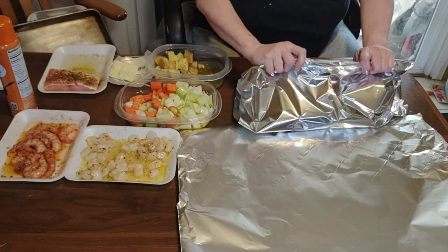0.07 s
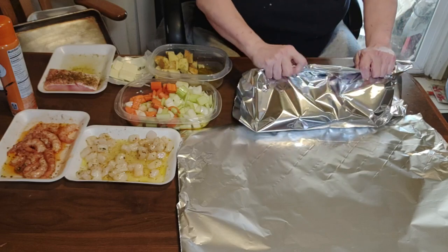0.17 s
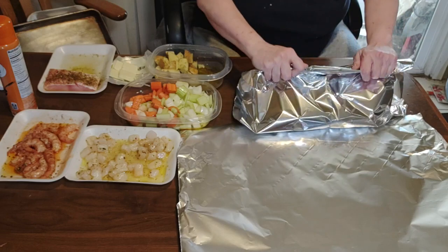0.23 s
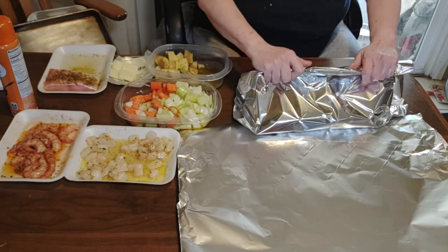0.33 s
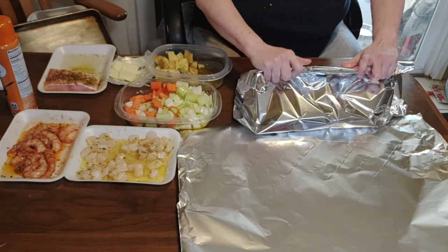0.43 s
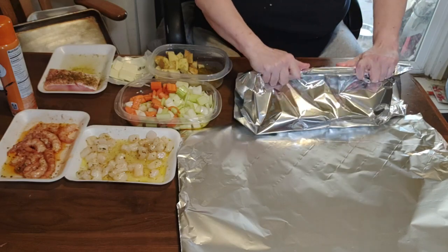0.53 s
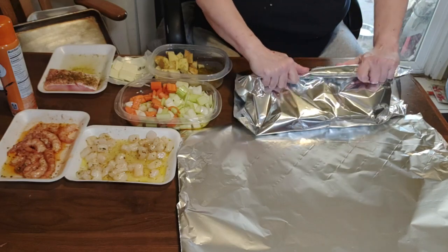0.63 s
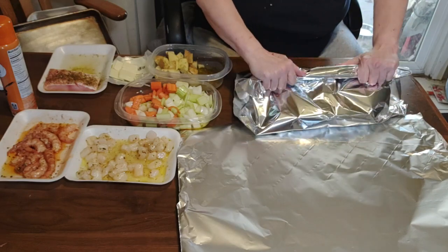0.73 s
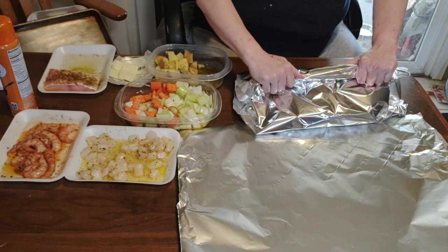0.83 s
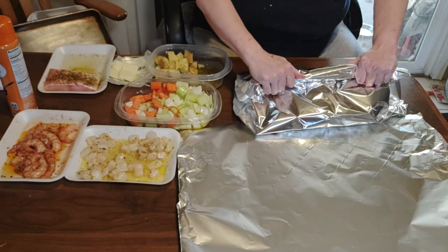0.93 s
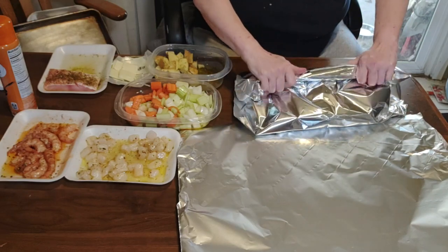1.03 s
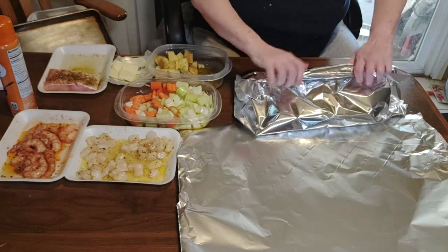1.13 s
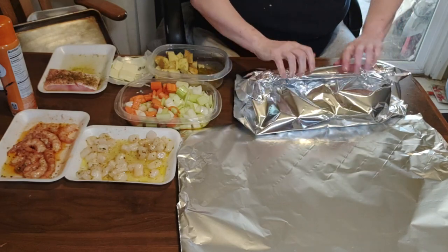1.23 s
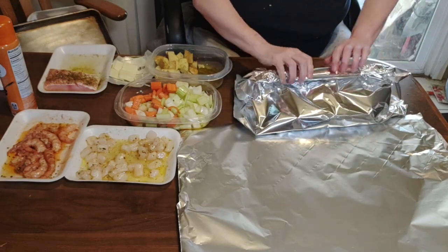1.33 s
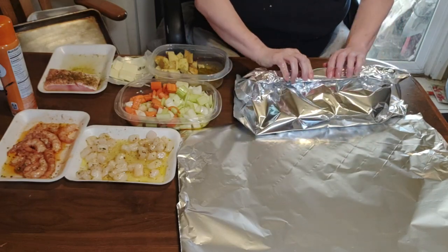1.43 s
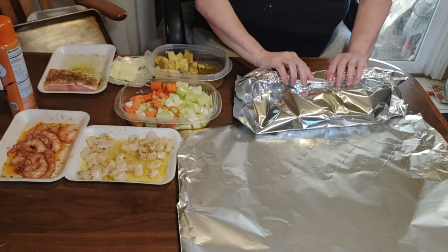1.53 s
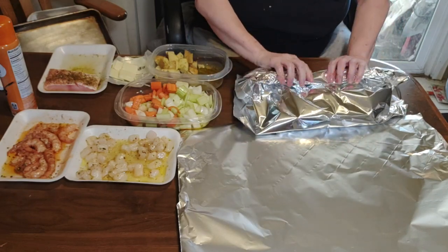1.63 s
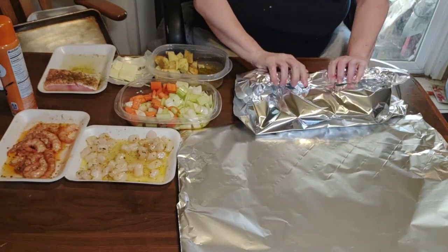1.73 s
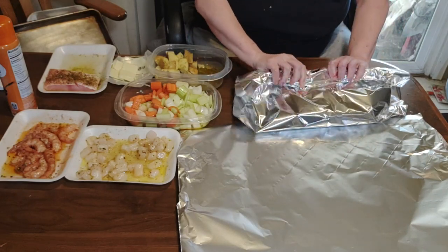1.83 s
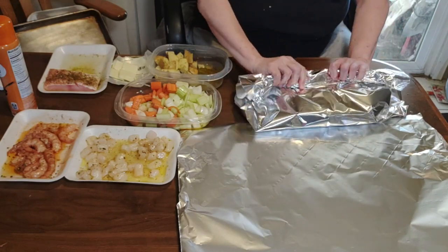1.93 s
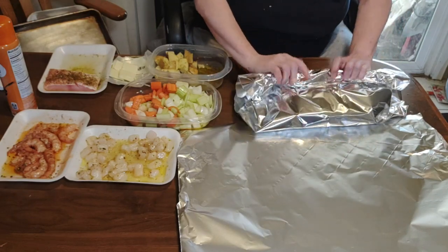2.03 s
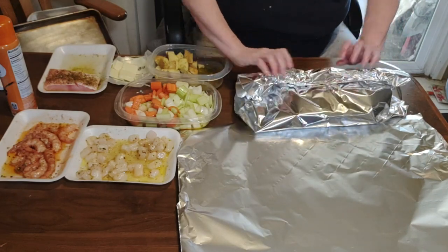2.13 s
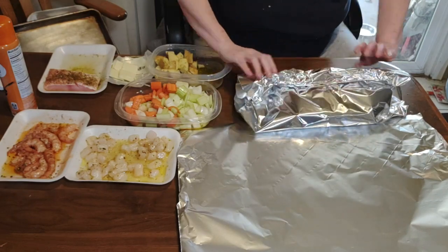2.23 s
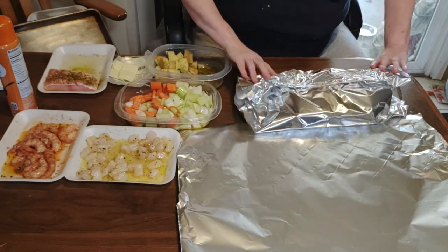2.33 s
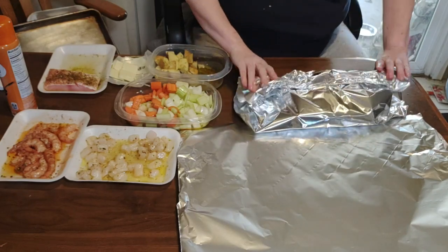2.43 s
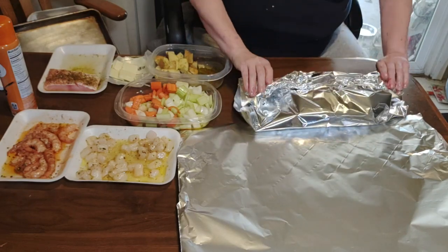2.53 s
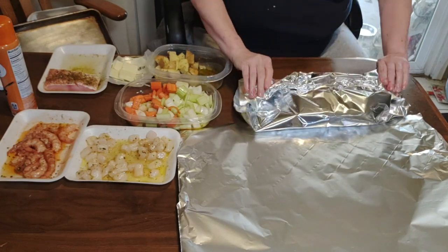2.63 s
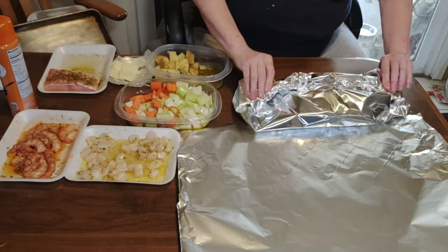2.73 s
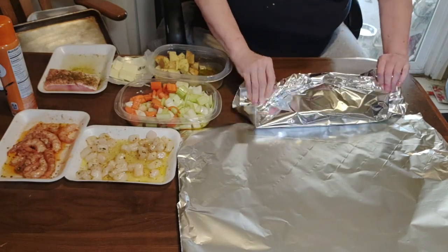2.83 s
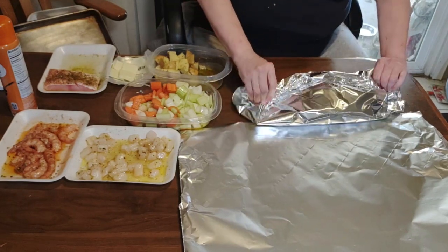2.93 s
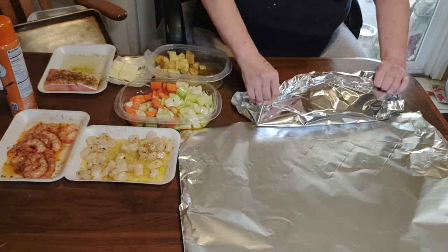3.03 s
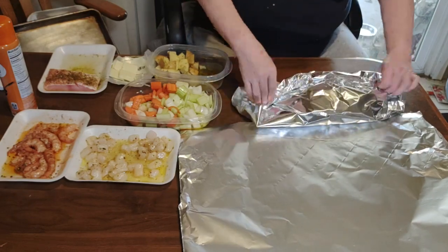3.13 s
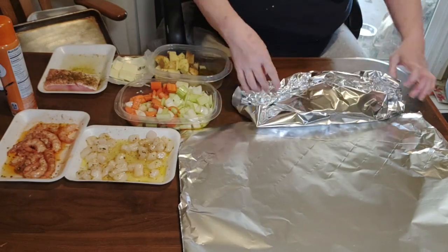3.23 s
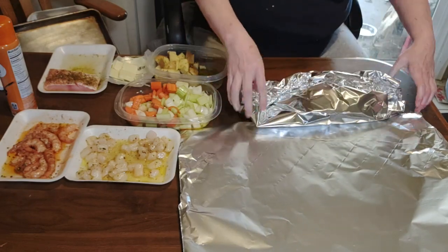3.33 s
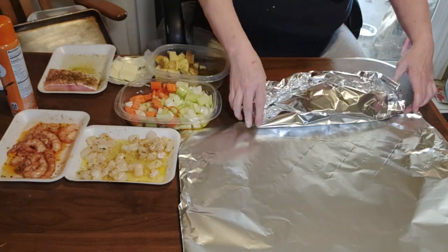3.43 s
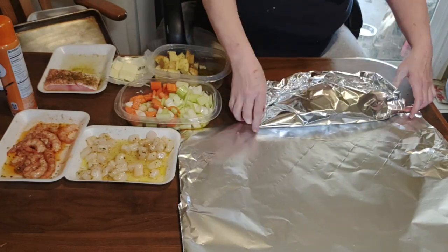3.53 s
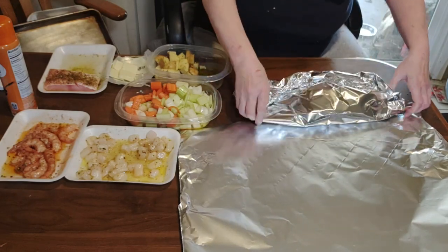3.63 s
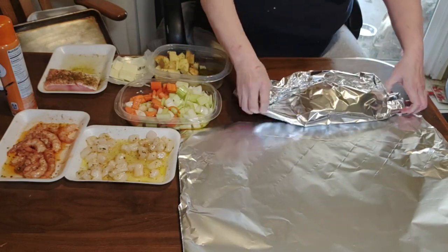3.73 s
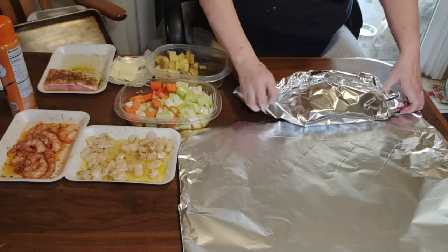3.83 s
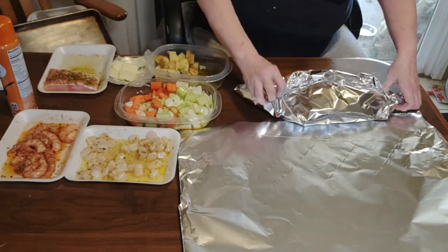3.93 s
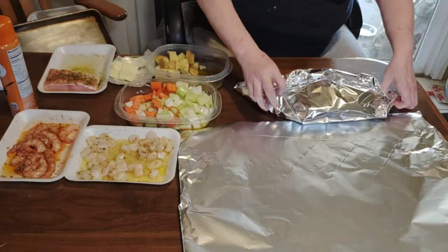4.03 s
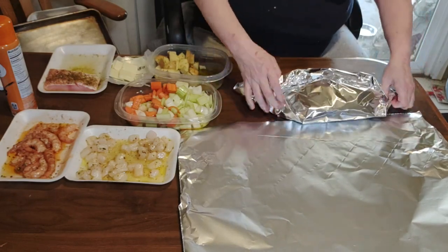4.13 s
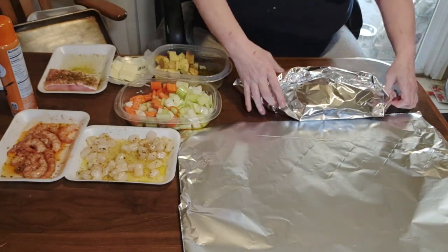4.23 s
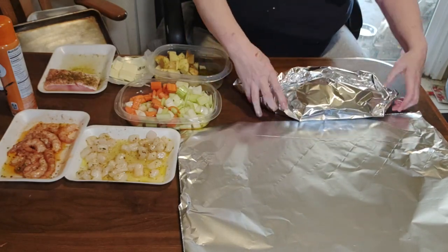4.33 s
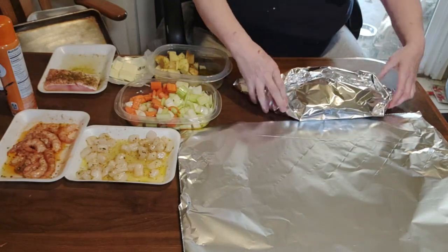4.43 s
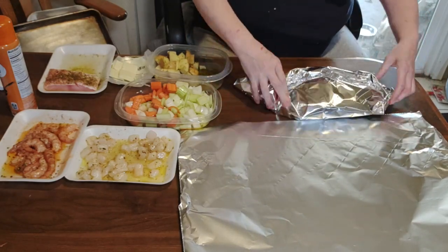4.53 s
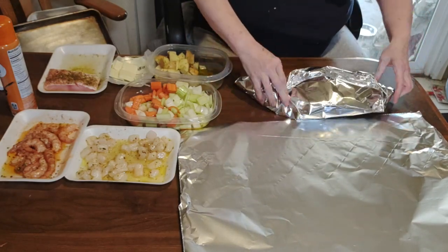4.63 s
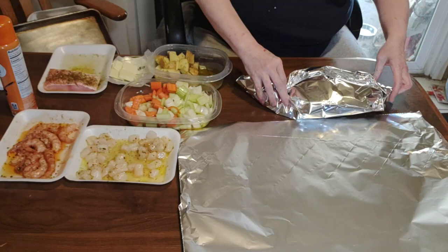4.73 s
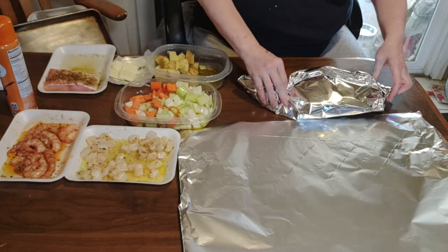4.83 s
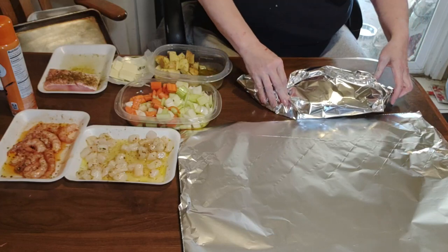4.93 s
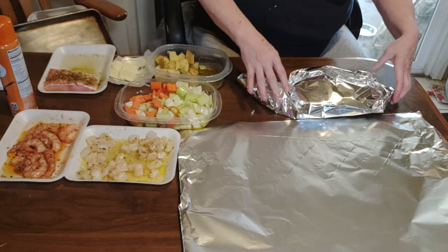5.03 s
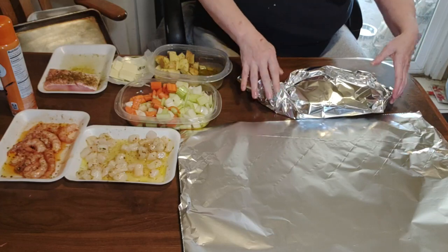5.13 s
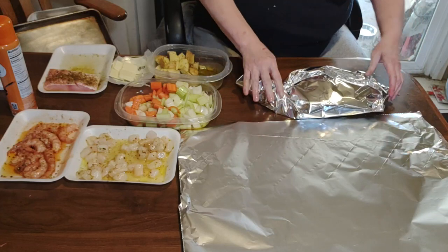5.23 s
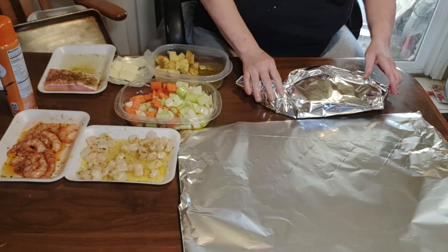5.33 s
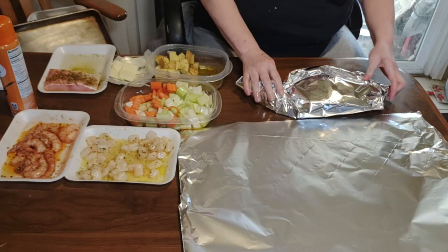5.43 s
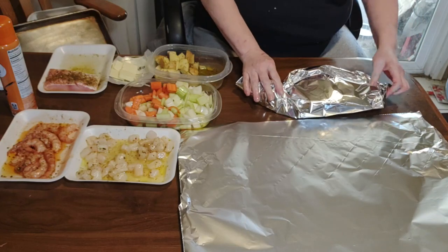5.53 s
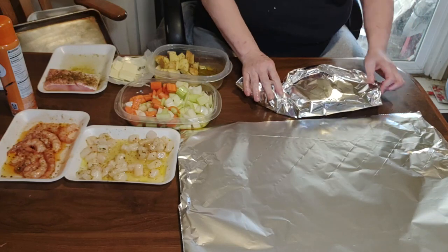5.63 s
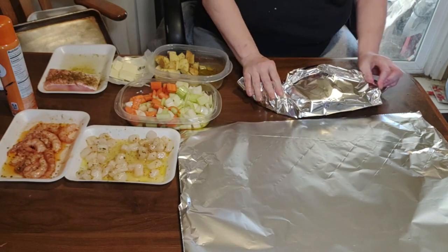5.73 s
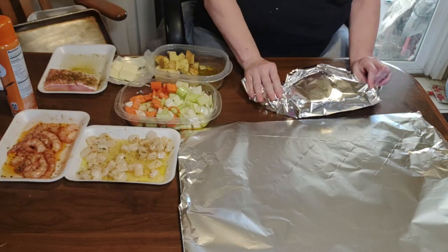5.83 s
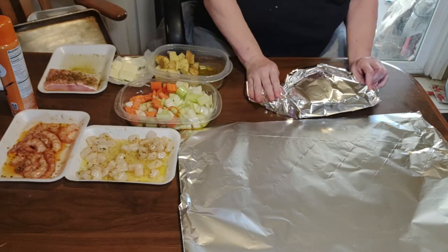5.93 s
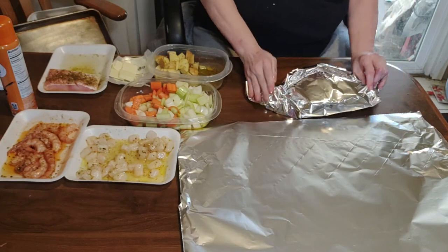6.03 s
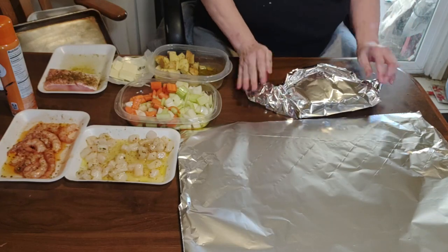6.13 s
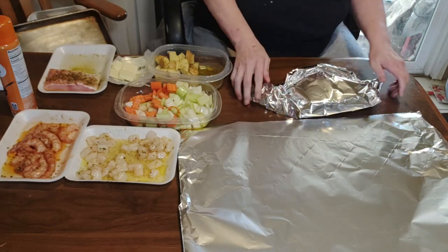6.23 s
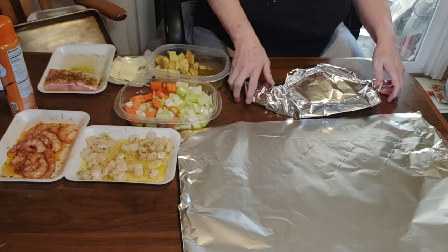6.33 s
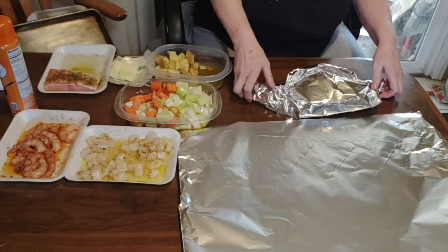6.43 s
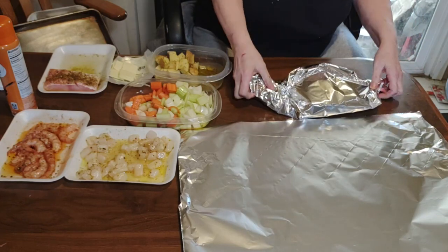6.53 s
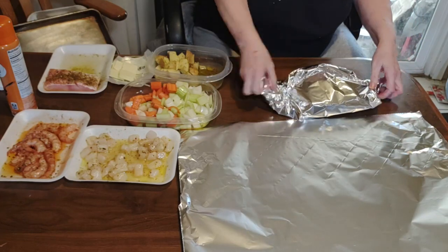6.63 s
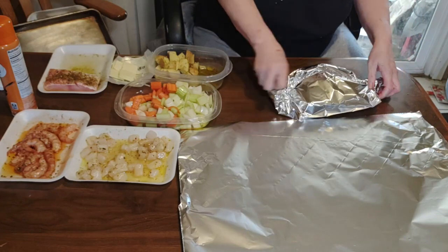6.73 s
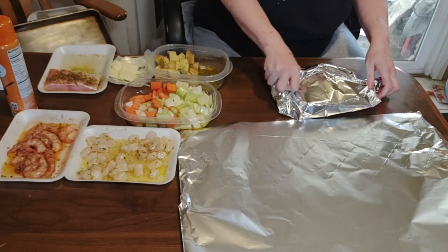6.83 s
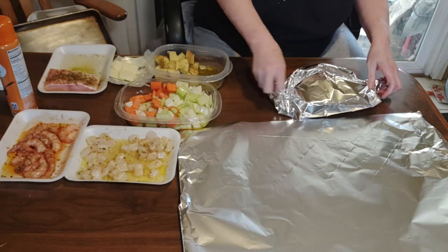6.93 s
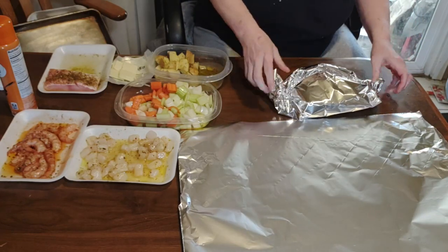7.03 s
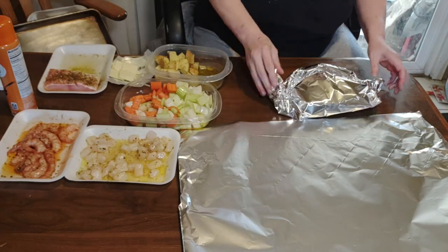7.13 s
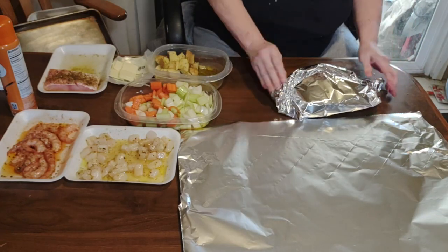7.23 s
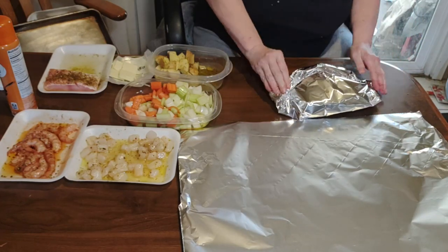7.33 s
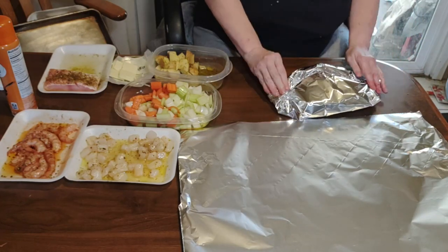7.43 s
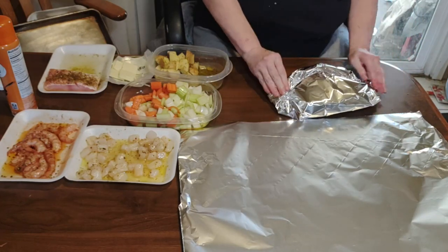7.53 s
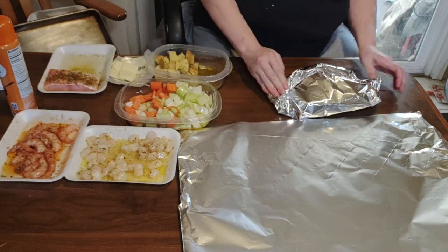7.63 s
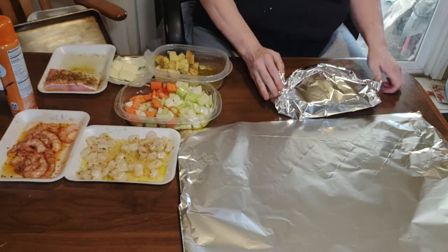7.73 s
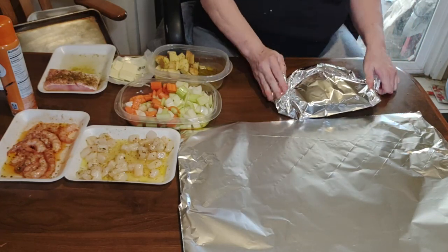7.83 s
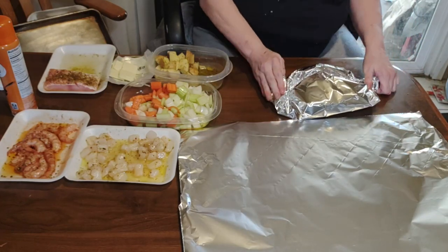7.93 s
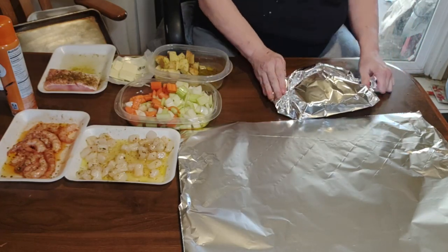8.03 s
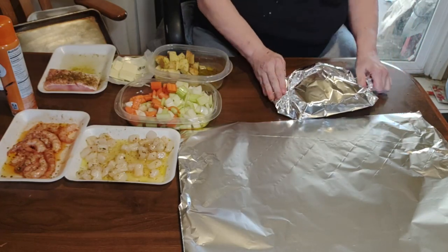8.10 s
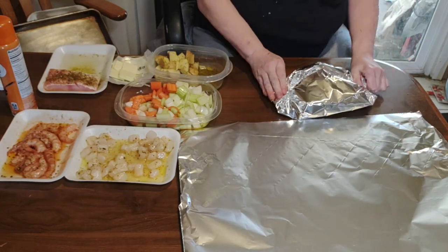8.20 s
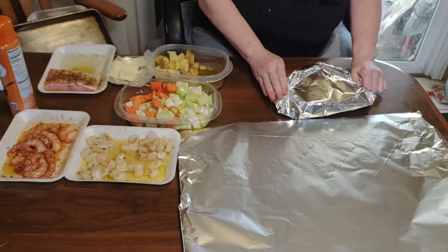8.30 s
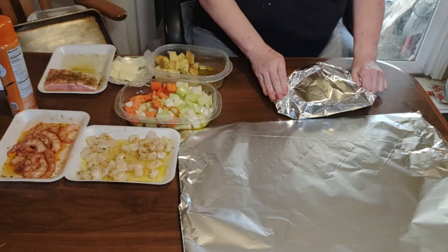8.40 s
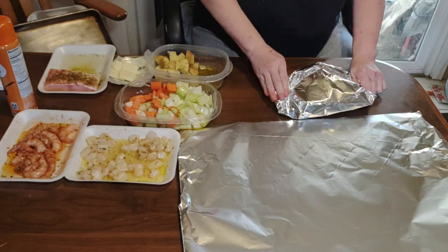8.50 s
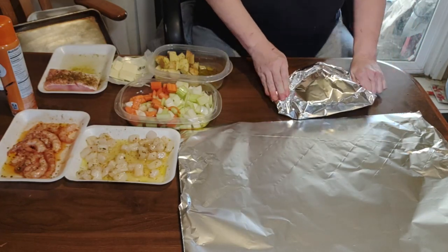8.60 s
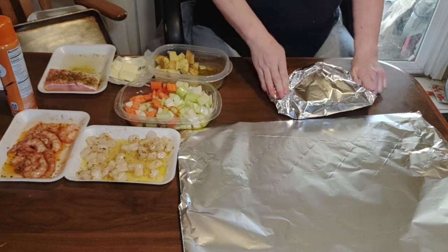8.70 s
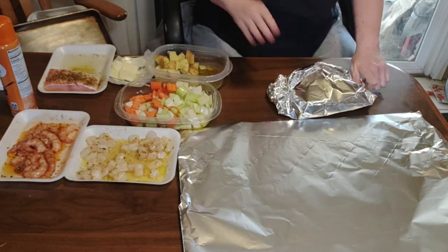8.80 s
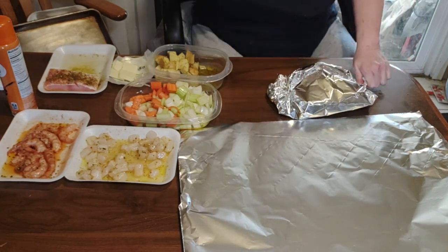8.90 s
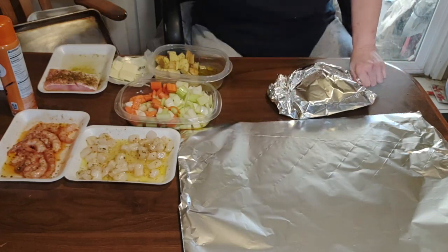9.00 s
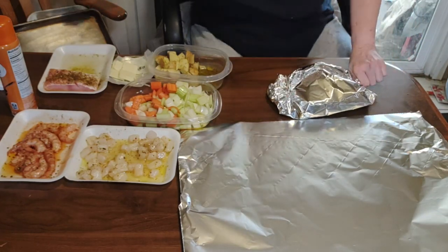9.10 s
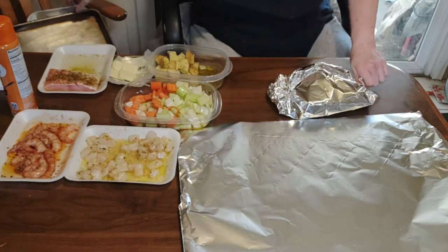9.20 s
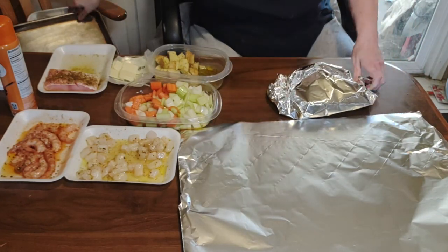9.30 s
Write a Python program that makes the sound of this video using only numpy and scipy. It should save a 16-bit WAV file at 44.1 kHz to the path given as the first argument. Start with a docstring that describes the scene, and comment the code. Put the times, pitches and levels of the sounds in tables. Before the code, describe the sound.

In a small kitchen with a quiet appliance hum, hands crumple a sheet of foil around food. Loud, dense, metallic crackle and sharp snaps come first, with hollow parcel thumps, low table rumbles and one short squeak. After a seam is rolled down the crinkle turns tighter and thinner, then squeezes get softer and sparser. Close stereo microphones, short room echoes.

```python
"""From the start, an appliance hums over soft room noise while two hands crumple foil round a parcel of food.
Each buckle of the sheet is a tiny falling chirp; many make the crinkle, and loud ones stand out as snaps.
From early on the parcel thumps hollowly and rumbles on the table; after one second the foil squeaks once.
Past three seconds a long seam is rolled down and the foil loses its low boom; later squeezes grow softer.
A small kitchen adds its short echoes to the foil, the squeak and the thumps throughout."""
import sys
import numpy as np
from scipy import signal
from scipy.fft import rfft, irfft, next_fast_len
from scipy.io import wavfile
from scipy.ndimage import uniform_filter1d

SR = 44100
rng = np.random.default_rng(int(sys.argv[2]) if len(sys.argv) > 2 else 0)


def waveform_to_disk(signal):
    """Save audio, clipped to [-1, 1], as 16-bit WAV at the path in sys.argv[1]."""
    frames = np.transpose(np.atleast_2d(signal))
    scaled = np.clip(frames, -1, 1) * 32767
    samples = np.round(scaled).astype(np.int16)
    wavfile.write(sys.argv[1], SR, samples)


N = 412759
TIME = np.arange(N) / SR  # seconds

# Levels in the tables are starting points: the functions may trim or filter them afterwards.
# soft background noise of the kitchen: pitch_hz, level_db (relative)
KITCHEN_COLOUR = [(25, -28), (60, -22), (95, -11.5), (150, 0.5), (185, -7), (240, -11.5), (390, -11),
                  (700, -16.5), (2000, -21.5), (6000, -23.5), (10000, -34.5), (16000, -37)]
KITCHEN_DB = -58.5
# steady tones of the appliance: pitch_hz, level_db (rms)
HUM_TONES = [(119.9, -65), (152, -69.5), (178, -71), (387, -74)]
# echoes of the kitchen: pitch_hz, fade_s (time to fall 60 dB), level_db, likeness of left and right (0-1)
ROOM_BANDS = [(200, 0.3, 3, 1), (523, 0.25, -2.5, 0.82), (1150, 0.25, 2.5, 0), (3230, 0.2, 2, 0),
              (9100, 0.12, 1.5, 0.05), (16100, 0.11, 1.5, .02)]
# shoves of the parcel across the table: start_s, hold_s, level_db (at mid-hold), change_db (over the hold)
SHOVES = [(0.2, .15, -65, 4), (1.88, 0.096, -72, 0), (2.42, 1.053, -70, -7), (4.04, .22, -63, 0),
          (4.5, 0.37, -78, 0), (5.55, 0.13, -69, 0)]
LEAN_DB = -81  # constant rumble of the table under the resting hands
# hollow thumps of the parcel under the fingers: start_s, level_db, pitch_hz
THUMPS = [(0.288, -21, 484.3), (0.592, -25, 500.2), (0.824, -26, 409.3), (0.889, -23, 493.7),
          (1.164, -21.5, 496.5), (1.606, -22, 678.4), (2.518, -32, 484), (2.648, -20, 519.3),
          (3.027, -23, 633.3), (3.108, -20, 568), (3.239, -18, 1030), (3.909, -25.5, 1083),
          (4.631, -23, 1018), (4.799, -25, 392.5), (4.848, -26, 484), (6.33, -46, 309.4),
          (6.449, -38.5, 317.6)]
# path of the squeak as foil slips on foil: time_s, pitch_hz, level_db
SQUEAK_PATH = [(1.066, 1360, -52), (1.08, 1356, -34.5), (1.11, 1360, -30.5), (1.135, 1306, -40),
               (1.15, 1279, -54.5)]
# overtones of the squeak: multiple of its pitch, level_db (relative)
SQUEAK_TONES = [(1, 5), (2, -5), (3, -4), (4, -13)]
# squeezes of the fingers: start_s, hold_s, level_db (crinkle at mid-hold), tighten_db (over the hold),
# body_db (big panels, relative to the crinkle), fizz_db (fine creases, relative to the crinkle)
SQUEEZES = [(0.004, 0.33, -26, -3, -8.5, -4), (0.379, 0.059, -35, -2, -8.5, -6.5),
            (0.506, 0.021, -40, -9, -3, -8.5), (0.568, 0.4, -29.0, -2, -6.5, -5.5),
            (1.01, 0.0298, -41, -2, -3, -9.5), (1.08, 0.107, -31.5, 4, -7.5, -7),
            (1.238, 0.068, -34.5, 9, -5, -6), (1.45, 0.2, -41.0, 17, -3.5, -11),
            (1.719, 0.13, -39.0, -1, -3.5, -8), (1.862, 0.128, -29, 5.5, -6, -5),
            (2.029, 0.18, -34.0, 2, -7, -3.5), (2.373, 0.078, -40.5, -8, -5, -12.5),
            (2.45, 0.096, -39.5, 13, -7, -5.5), (2.631, 0.14, -28.0, -1, -7, -5),
            (2.844, 0.28, -28.0, -5, -7.5, -6), (3.2, 0.09, -31.5, -1, -7, -6.5),
            (3.592, 0.019, -50.5, -10, -5, -16), (3.659, 0.32, -35.0, 5, -9.5, -6),
            (4.006, 0.16, -36.5, 2, -4, -8), (4.2, 0.03204, -30.5, -4, -8.5, -6),
            (4.276, 0.13, -45.0, 9, -5, -14), (4.489, 0.23, -37.5, 19, -4.5, -8),
            (4.736, 0.27, -42.0, -1, 1, -7.5), (5.052, 0.045, -37.0, -4, -4.5, -11.5),
            (5.232, 0.013, -53.5, -7, -1.5, -12.5), (5.29, 0.1017, -41.5, 5, -7.5, -8.5),
            (5.453, 0.016, -46.5, -7, -6, -2.5), (5.521, 0.2, -38.0, 10, -6, -7.5),
            (5.84, 0.175, -34.5, 7, -5, -6), (6.1, 0.0755, -49.0, 7, -2, -7),
            (6.305, 0.0397, -63, 0, -5.5, -9), (6.46, 0.109, -49, 8, -2.5, -6.5),
            (6.595, 0.305, -36.5, 5, -8, -6), (6.989, 0.1, -44.5, 3.5, -4, -12),
            (7.22, 0.15, -56.5, 15, -6, -11), (7.395, 0.099, -40.0, -1, -5.5, -13.5),
            (7.596, 0.089, -52.0, 5, -10.5, -9), (7.758, 0.04, -51, -2, -5.5, -8),
            (7.865, 0.07, -51, -3.5, 0, -11), (7.996, 0.058, -43.0, 2, -12.5, -10.5),
            (8.113, 0.24, -43.0, 6, -5, -8), (8.575, 0.075, -51, 4.5, -10, -9),
            (8.806, 0.063, -49.5, -12.5, -3.5, -12), (8.93, 0.12, -53.5, 6, -8, -11),
            (9.314, 0.04, -55.5, 8, 3.5, -16)]
# how fast the fingers take hold, and how fast the sheet comes to rest when they let go
GRIP_DB_PER_S, RELAX_DB_PER_S = 443, 339
# single loud buckles: start_s, peak_db (of the crack), body_db (rms), fizz_db (rms), ring_hz (of the facet)
LOUD_BUCKLES = [(0.1101, -13, -34, -21, 5906), (0.1614, -12.5, -35, -19, 2653),
                (0.1774, -14, -28, -29, 1821), (0.2244, -10, -28.5, -29, 4380),
                (0.2853, -15, -27, -34, 3547), (0.3197, -15.5, -39, -17.5, 5700),
                (0.4234, -21, -47, -42, 2564), (0.5207, -22, -42, -31.5, 2610),
                (0.6784, -16, -44, -25, 2582), (0.7392, -31, -38, -31, 4079),
                (1.1764, -22, -26.5, -42, 3111), (1.2945, -33, -48, -36, 6120),
                (1.497, -29, -47, -49.5, 2608), (1.5359, -25.5, -34.5, -49, 2872),
                (1.6661, -29, -52, -33, 3479), (1.7689, -22.5, -46, -34.5, 2886),
                (1.9454, -12.5, -32, -28, 3468), (2.3511, -28.5, -46, -40.5, 4154),
                (2.3735, -22.5, -42, -39, 3467), (2.4977, -26, -50, -32, 5063),
                (2.6165, -31, -43, -30.5, 3121), (2.7192, -20, -35, -35, 3630),
                (2.8604, -13, -31, -23, 4919), (3.0096, -16, -34, -19.5, 3675),
                (3.1921, -27, -37, -43, 1571), (3.6391, -32, -47, -38, 1608), (3.6511, -22, -44, -40, 2701),
                (3.7454, -17.5, -36, -27, 4137), (3.8057, -22, -33, -34, 1915),
                (3.8337, -26, -37, -35, 1626), (3.912, -24, -28.5, -42, 1950),
                (3.9509, -19, -30, -28, 2962), (4.0118, -30, -49, -35, 5620), (4.1056, -25, -41, -44, 1908),
                (4.2023, -21, -32, -22, 4697), (4.2194, -32, -36, -28, 6510), (4.349, -28, -54, -38, 1302),
                (4.4074, -21.5, -41, -41, 2625), (4.4852, -36, -51, -41, 4330),
                (4.569, -24.5, -39, -42, 2664), (4.6319, -22, -28.5, -45.5, 1392),
                (4.7042, -22, -34, -29, 2065), (4.8484, -28.5, -34, -55, 1706),
                (4.8903, -23.5, -37, -31, 2840), (5.0484, -30, -37, -34, 1340),
                (5.0908, -23, -34.5, -33.5, 1948), (5.2879, -27.5, -39.5, -41, 4241),
                (5.3527, -20, -52, -37, 3489), (5.5438, -25, -48, -55, 1551), (5.5702, -22, -39, -42, 3280),
                (5.6745, -28, -31.5, -29, 2820), (5.7399, -32, -46.5, -35, 4582),
                (5.8381, -37, -38.5, -54, 1973), (5.8915, -20, -35, -46, 2758),
                (5.9389, -19, -34, -31.5, 3487), (6.3031, -44, -59, -58.5, 5962),
                (6.4487, -42, -52, -60, 1551), (6.4926, -31.5, -49, -49, 3561),
                (6.6593, -24, -38, -41.5, 2163), (6.7381, -20, -31, -38, 3783),
                (6.8334, -27, -57, -36, 2688), (6.8932, -22, -45.5, -36.5, 1583),
                (7.0628, -24.5, -45, -50.5, 2869), (7.1985, -38, -55, -76, 1828),
                (7.2409, -37.5, -60, -56, 4177), (7.3382, -35.5, -63, -54.5, 4735),
                (7.4215, -22.5, -39, -47, 2184), (7.4769, -24.5, -43, -47, 2195),
                (7.4894, -29, -47, -49, 2640), (7.6575, -37, -53, -55, 1300),
                (7.7623, -38, -57, -42.5, 2904), (7.863, -33, -41, -47, 2108),
                (7.9872, -29, -51, -33.5, 4727), (8.0441, -36, -52, -51, 1714),
                (8.2834, -32, -52, -39.5, 7040), (8.3524, -33, -47, -46.5, 2355),
                (8.6248, -28.5, -53, -51, 4825), (8.8049, -34, -50, -54.5, 2984),
                (8.8653, -36, -53, -58, 2074), (8.9565, -38, -59, -65.5, 1599),
                (9.0513, -33.5, -54, -53, 3450)]
CREST_DB = 9  # a crack's peak stands this far over its rms level
# colour of the crumpling sheet: pitch_hz, level_db (relative)
FOIL_COLOUR = [(60, -40), (140, -3), (215, -9.5), (260, -10), (376, -0.5), (431, -4.5), (484, -2), (649, 0),
               (1100, -1.5), (1650, -2.2), (2310, -4.5), (2650, -2.5), (6020, -7.5), (10600, -17.5),
               (15100, -14.5), (16000, -42)]
CHIRP_SAMPLES = 512  # room for one chirp
SNAP_S = .003  # a buckle's rms level is counted over this time
# balance of the two microphones: pitch_hz, level_db (left minus right)
BALANCE = [(60, 0), (110, 1), (200, -0.5), (380, 0), (700, -0.5), (1290, -1), (2380, 0), (4400, -0.5),
           (8120, -4.5), (15000, 4.5)]
TOP_HZ = 16100  # upper limit of the sound


def undb(db):
    """Turn decibels into gain."""
    return 10 ** (np.asarray(db) / 20)


def unit(x):
    """Scale to rms 1."""
    return x / np.sqrt(np.mean(x ** 2))


def follow(table, t):
    """Read the columns of a curve at the times t."""
    s, *columns = np.transpose(table)
    return [np.interp(t, s, c) for c in columns]


def across(table, hz):
    """Read the columns of a spectrum at the pitches hz, along an octave-like (log) scale."""
    f, *columns = np.transpose(table)
    return [np.interp(np.log(np.maximum(hz, 1)), np.log(f), c) for c in columns]


def colour(x, table):
    """Filter by a spectrum of pitch_hz and level_db."""
    size = next_fast_len(N + CHIRP_SAMPLES)
    gain = undb(across(table, np.fft.rfftfreq(size, 1 / SR))[0])
    return irfft(rfft(x, size) * gain, size)[..., :N]


def kitchen(waver=0.14):
    """An appliance hums with slightly drifting tones over soft room noise that is wide only in the treble."""
    mid, side = colour(rng.standard_normal((2, N)), KITCHEN_COLOUR)
    side = colour(side, [(150, -15.5), (500, -3), (1500, 0)])
    air = undb(KITCHEN_DB) * unit(mid + side * np.array([[1], [-1]]))
    drift_s = np.linspace(0, N / SR, num=40)
    for hz, db in HUM_TONES:
        drift = np.interp(TIME, drift_s, np.cumsum(waver * rng.standard_normal(len(drift_s))))
        air = air + np.sqrt(2) * undb(db) * np.sin(2 * np.pi * hz * TIME + drift)
    return air


def room(x, first_s=0.0026, build_s=0.00026, wet_db=0, size=16384):
    """Table, cupboards and walls add a short fading tail, most alike on both sides in the bass."""
    age, hz = TIME[:size], np.fft.rfftfreq(size, 1 / SR)
    mid, side = rfft(rng.standard_normal((2, size)))
    alike = np.clip(across(ROOM_BANDS, hz)[2], 0, 1)
    shared = np.sqrt((1 + alike) / 2) * mid
    opposed = np.sqrt((1 - alike) / 2) * side * np.array([[1], [-1]])
    noise = shared + opposed
    onset = 1 - np.exp(-np.maximum(age - first_s, 0) / build_s)
    centres = np.array(ROOM_BANDS)[:, 0]
    response = 0
    for (_, fade_s, db, _), pick in zip(ROOM_BANDS, np.eye(len(ROOM_BANDS))):
        # each band blends smoothly into its neighbours
        band = across(np.column_stack([centres, pick]), hz)[0]
        fade = onset * undb(-60 * age / fade_s)
        response = response + irfft(band * noise) * (undb(db + wet_db) * fade / np.linalg.norm(fade))
    return x + signal.oaconvolve(x, response, axes=1)[:, :N]


def press(table, t):
    """Level in dB of each push at the times t: it takes hold, tightens or eases steadily, and lets go."""
    start, hold, db, tighten_db = np.transpose(table)[:4, :, None]
    age = t - start
    progress = np.clip(age / np.maximum(hold, 1 / SR), 0, 1)
    held = db + tighten_db * (progress - .5)
    return held - GRIP_DB_PER_S * np.maximum(-age, 0) - RELAX_DB_PER_S * np.maximum(age - hold, 0)


def table_rumble(trim_db=-4.0):
    """Low noise swells as the parcel slides on the table, over a faint rumble from the resting hands."""
    low_colour = [(20, -24), (55, -3), (80, 9), (130, -16), (400, -57)]
    rumble = unit(colour(rng.standard_normal(N), low_colour))
    sliding = undb(press(SHOVES, TIME).max(axis=0) + trim_db)
    return rumble * (sliding + undb(LEAN_DB))


def parcel_thumps(ring_cycles=20, rise_s=0.00093, width=0.21, trim_db=-3.0):
    """The filled parcel gives soft, hollow thumps when pressed: short noise bursts around one pitch."""
    out, age = np.zeros(N), TIME[:SR // 4]
    for s, db, hz in THUMPS:
        band = signal.butter(2, [hz / (1 + width), hz * (1 + width)], "band", fs=SR, output="sos")
        noise = unit(signal.sosfilt(band, rng.standard_normal(len(age))))
        fade = undb(-60 * age * hz / ring_cycles)  # falls 60 dB in ring_cycles swings
        thump = noise * fade * (1 - np.exp(-age / rise_s))
        first = int(s * SR)
        out[first:first + len(age)] += undb(db + trim_db) * thump
    return out


def squeak(waver=0.0128, trim_db=-2.2):
    """Foil sticks and slips on foil: a short, slightly unsteady tone with overtones."""
    hz, db = follow(SQUEAK_PATH, TIME)
    wobble = unit(uniform_filter1d(rng.standard_normal(N), size=150))
    phase = 2 * np.pi * np.cumsum(hz * (1 + waver * wobble)) / SR
    tone = sum(undb(tone_db) * np.sin(round(k) * phase) for k, tone_db in SQUEAK_TONES)
    sounding = (TIME > SQUEAK_PATH[0][0]) * (TIME < SQUEAK_PATH[-1][0])
    return unit(tone) * undb(db + trim_db) * sounding


def work(t):
    """The squeezes add up to the crinkle's level; the stronger each is, the more it sets body and fizz."""
    power = undb(press(SQUEEZES, t)) ** 2
    total = power.sum(axis=0) + 1e-18  # never zero
    body_db, fizz_db = np.transpose(SQUEEZES)[-2:] @ power / total
    return 10 * np.log10(total), body_db, fizz_db


def avalanches(per_s=16, random_size=6.6, snap_size=3.0, fade_s=0.0049, most_db=12):
    """A buckle loads its neighbours: at random moments and at snaps the crackle jumps up, then dies away."""
    kicks = (rng.random(N) < per_s / SR) * rng.exponential(random_size, N)
    t, peak_db = np.transpose(LOUD_BUCKLES)[:2]
    over_crinkle_db = np.clip(peak_db - CREST_DB - work(t)[0], 0, most_db)
    kicks[(t * SR).astype(int)] += snap_size * undb(over_crinkle_db / 2)
    return 1 + signal.lfilter([1], [1, -np.exp(-1 / (fade_s * SR))], kicks)


def crinkle(most_per_s=900, full_db=-33, thinning=.4, rest_db=-70, scatter_db=5.0, tint_db=4.0,
            trim_db=-4.5, body_trim_db=-1.03, most_body_db=2, fizz_trim_db=1.5,
            ahead_s=.001, even_s=0.032, facet_hz=3600, facet_spread=0.54):
    """Small buckles come at random; the harder the hands squeeze, the more and the louder they come."""
    chance = rng.random((10000, 2))  # candidate moments, and the luck of each
    t = chance[:, 0] * N / SR
    size, body, fizz, facet = np.clip(rng.standard_normal((len(t), 4)).T, -2, 2)
    db, body_db, fizz_db = work(t + ahead_s)
    # the creased foil goes on settling between grips
    db = np.maximum(db, rest_db)
    wanted_per_s = most_per_s * undb(thinning * np.minimum(db - full_db, 0))
    flips = chance[:, 1] * len(t) * SR / N < wanted_per_s
    sample = (t * SR).astype(int)
    size_db = scatter_db * size + 10 * np.log10(avalanches()[sample])
    # buckles close in time share the work that the hands put in
    power = np.bincount(sample, flips * undb(size_db) ** 2, N) * SNAP_S * SR
    for _ in range(2):
        power = uniform_filter1d(power, int(even_s * SR))
    db = db + trim_db + size_db - 10 * np.log10(np.maximum(power[sample], 1e-3))
    body_db = np.minimum(body_db + body_trim_db + tint_db * body, most_body_db)
    fizz_db = fizz_db + fizz_trim_db + tint_db * fizz
    ring_hz = facet_hz * np.exp(facet_spread * facet)
    return np.array([t, db, body_db, fizz_db, ring_hz])[:, flips]


def snaps(trim_db=-4.0):
    """Large facets give way one at a time: the listed loud buckles, with body and fizz made relative."""
    t, peak_db, body_db, fizz_db, ring_hz = np.transpose(LOUD_BUCKLES)
    db = peak_db - CREST_DB
    return np.array([t, db + trim_db, body_db - db, fizz_db - db, ring_hz])


def buckles(t, db, body_db, fizz_db, ring_hz, ring_db=13, ring_octaves=0.3,
            panel_hz=580, tight_panel_hz=780, panel_spread=0.38, panel_db=11,
            sweep_s=0.003216, scatter_s=0.001313, ripple_db=3, body_hz=1300, fizz_hz=7500,
            pan_db=2, lag_s=.00005, spread_s=.00006):
    """Facets of foil flip over: each gives a short chirp with its own ring and place between the hands."""
    hz = np.fft.rfftfreq(CHIRP_SAMPLES, 1 / SR) + 1  # 1 Hz up, so that it is never zero
    path, side, lag, panel = rng.standard_normal((len(t), 4)).T[:, :, None]
    ripple, detour = (unit(uniform_filter1d(rng.standard_normal((len(t), len(hz))), size=5))
                      for _ in range(2))
    # the facet rings high, the panel that carries it rings low; panels shrink as the folding goes on
    panel_hz = np.interp(t, [0, N / SR], [panel_hz, tight_panel_hz])[:, None]
    panel_hz = panel_hz * np.exp(panel_spread * np.clip(panel, -1.5, 1.3))
    ring = 0
    for centre, height_db in ((ring_hz[:, None], ring_db), (panel_hz, panel_db)):
        ring = ring + height_db * np.exp(-.5 * (np.log2(hz / centre) / ring_octaves) ** 2)
    spectrum = undb(across(FOIL_COLOUR, hz)[0] + ring + ripple_db * ripple)
    # big panels give the body, facets the crack, fine creases the fizz
    above_body, fizz = (1 / (1 + (edge / hz) ** 10) for edge in (body_hz, fizz_hz))
    parts = ((1 - above_body, db + body_db), (above_body - fizz, db), (fizz, db + fizz_db))
    power_gain = 0
    for share, part_db in parts:
        energy = 2 / CHIRP_SAMPLES * np.sum(share * spectrum ** 2, axis=1)
        power_gain = power_gain + share * (undb(part_db) ** 2 * SNAP_S * SR / energy)[:, None]
    # bending waves run faster at high pitch, so the treble arrives first
    delay = sweep_s * np.exp(0.2528 * path) / np.sqrt(1 + hz / 1500)
    lead = CHIRP_SAMPLES // 8  # samples kept free ahead of the chirp
    # creases send each pitch on its own detour
    delay = delay - delay[:, -1:] + scatter_s * abs(detour) + lead / SR
    # adding up the delays over pitch gives the phase
    turns = np.cumsum(delay, axis=1) * SR / CHIRP_SAMPLES
    spectrum = spectrum * np.sqrt(power_gain) * np.exp(-2j * np.pi * turns)
    # half of the level and time difference goes to each ear
    place = undb(pan_db * side / 2) * np.exp(-1j * np.pi * hz * (lag_s + spread_s * lag))
    samples = (t * SR).astype(int)[:, None] + np.arange(CHIRP_SAMPLES) - lead
    samples = np.maximum(samples, 0).ravel()
    return np.array([np.bincount(samples, irfft(ear).ravel(), N)[:N]
                     for ear in (spectrum * place, spectrum / place)])


def stiffen(x, folded_s=3.37, loose_db=1.84, tight_db=-2.0, panel_hz=520):
    """Once the long seam is rolled down the panels are small and tight, and lose their low boom."""
    boom = signal.sosfiltfilt(signal.butter(3, panel_hz, fs=SR, output="sos"), x)
    boom_db = np.interp(TIME, [folded_s - .2, folded_s + 0.23], [loose_db, tight_db])
    return x + boom * (undb(boom_db) - 1)


def foil(count=10, facing_db=-7):
    """Buckles come from many spots with their own echoes; large facets also beam straight at the listener."""
    small, large, out = crinkle(), snaps(), 0
    for spot in range(count):
        cracks = buckles(*large[:, spot::count], ring_db=11, sweep_s=0.002795, scatter_s=0.001216)
        crackle = buckles(*small[:, spot::count])
        out = out + room(crackle + cracks) + undb(facing_db) * cracks
    return stiffen(out)


def scene():
    """The kitchen and the table rumble lie behind; thumps, squeak and foil sound in the room."""
    behind = kitchen() + table_rumble()
    small_sounds = np.tile(parcel_thumps() + squeak(), (2, 1))
    return behind + room(small_sounds, wet_db=-6.0) + foil()


def record(dry):
    """The two microphones differ a little in colour; the deep bass and the top are cut."""
    tinted = np.array([colour(x, [(hz, ear * db / 2) for hz, db in BALANCE])
                       for x, ear in zip(dry, (1, -1))])
    lean = signal.sosfilt(signal.butter(2, 38, "high", fs=SR, output="sos"), tinted)
    return signal.sosfilt(signal.ellip(10, .2, 80, TOP_HZ, fs=SR, output="sos"), lean)


dry = scene()
out = record(dry)
waveform_to_disk(out)
```